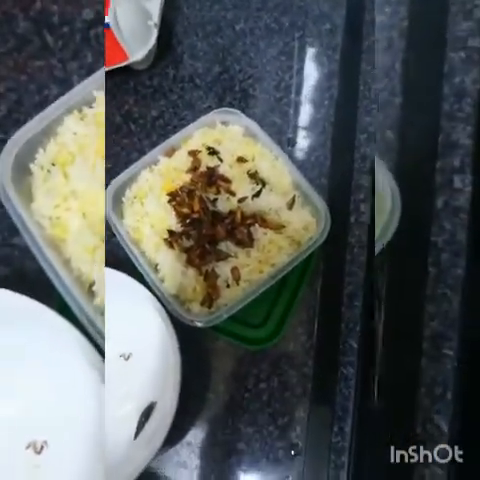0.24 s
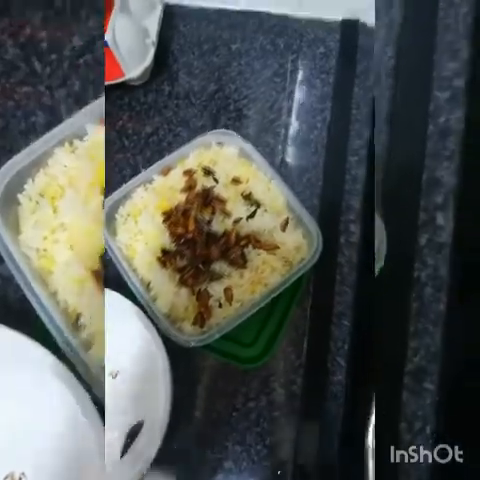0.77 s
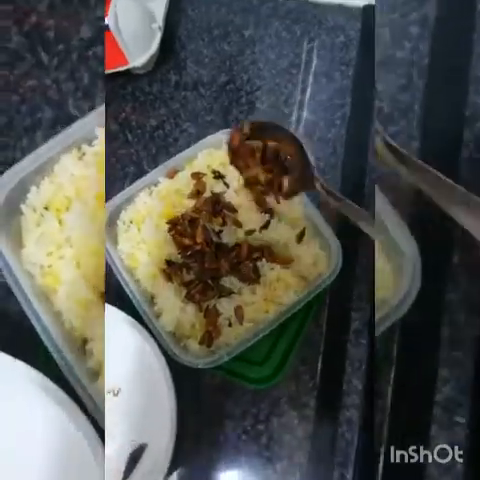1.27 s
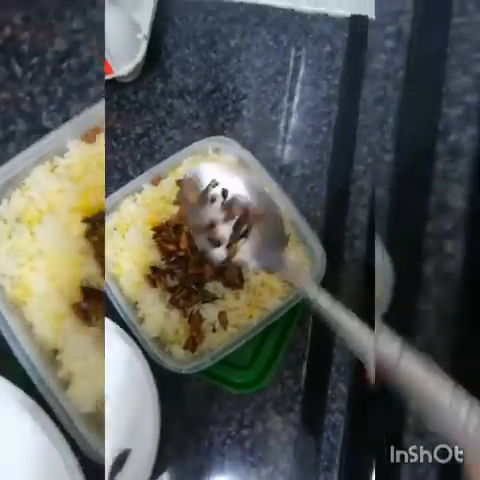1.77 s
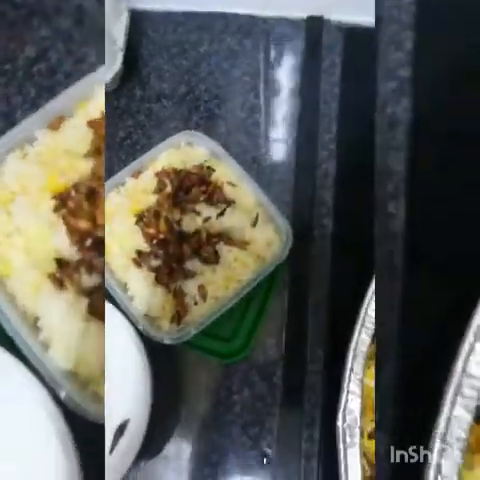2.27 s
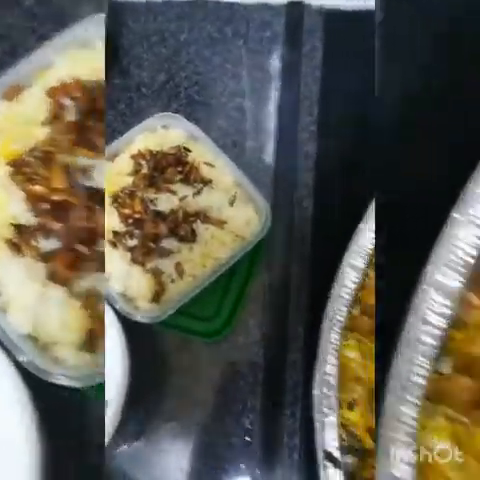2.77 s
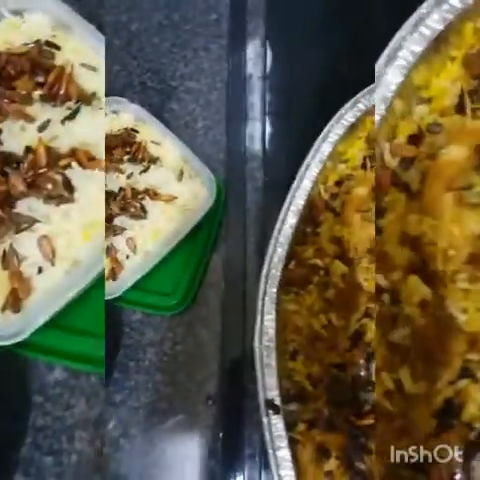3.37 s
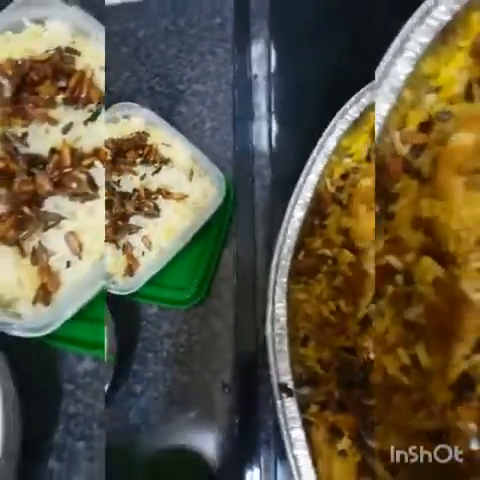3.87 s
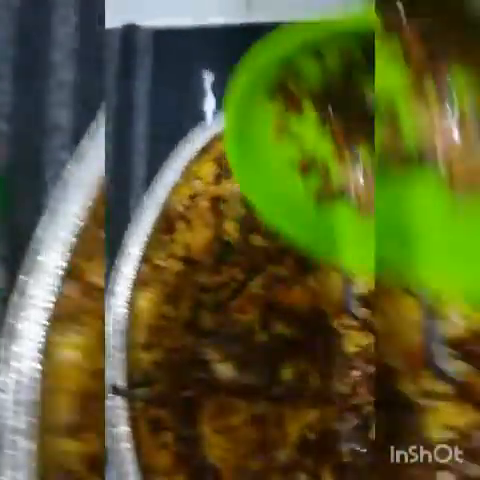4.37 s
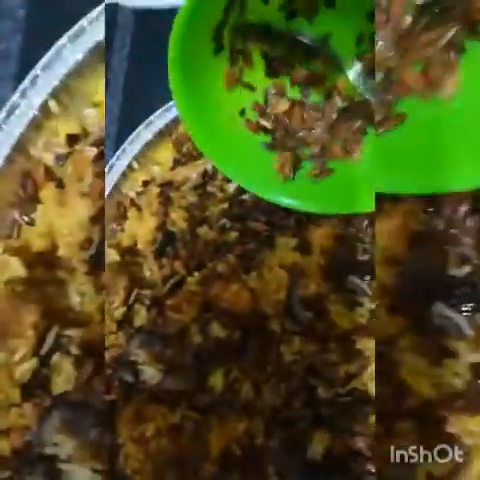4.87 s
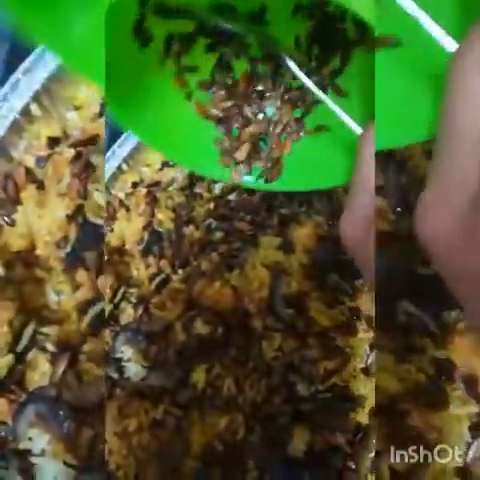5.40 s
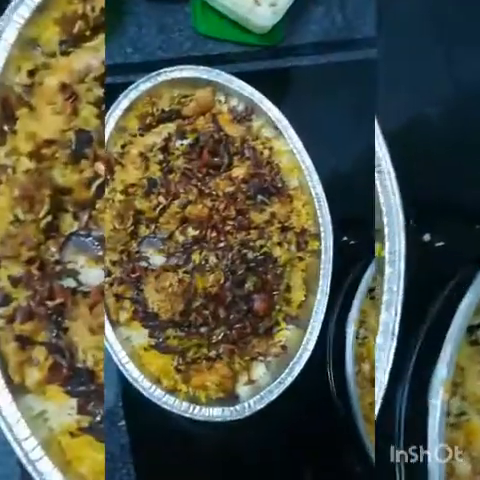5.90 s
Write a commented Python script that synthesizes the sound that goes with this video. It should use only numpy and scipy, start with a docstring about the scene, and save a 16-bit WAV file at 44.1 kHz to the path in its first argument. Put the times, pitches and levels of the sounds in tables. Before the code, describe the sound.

A burst of crisp foil and plastic crinkling opens at once, with a container knocking and thudding on a stone counter. After a quiet gap over faint appliance hum, the container bumps and rocks to rest. A soft hollow tap follows, then a spoon scrapes and cracks crisp fried onion in a plastic bowl while a low drone swells. Close stereo phone microphone, small hard kitchen.

```python
"""Thin foil and plastic crinkle at once as a container knocks and thuds on a stone kitchen counter,
over a low appliance hum and room rumble. Later the container rocks to rest, a bowl gives a hollow tap,
and a spoon scrapes crisp fried onion in the plastic bowl while a low drone swells. Snaps and cracks are
sharp pulses plus dying noise, rubbing is dense tiny clicks plus hiss, thuds and rings are dying sines.
A phone's two microphone ports hear it close by, and a small hard room answers the handling."""
import sys
import numpy as np
from scipy import signal
from scipy.fft import rfft, irfft
from scipy.io import wavfile
from scipy.ndimage import uniform_filter1d

SR = 44100
rng = np.random.default_rng(int(sys.argv[2]) if len(sys.argv) > 2 else 0)


def wrap_up_sound(samples):
    """Save the sound to the file named by the first command line argument, as 16-bit audio."""
    columns = np.atleast_2d(samples).T
    # keep every value between -1 and 1, then stretch to whole-number steps
    tamed = np.clip(columns, -1, 1)
    steps = np.round(tamed * 32767).astype(np.int16)
    wavfile.write(sys.argv[1], SR, steps)


N = 271082
TIME = np.arange(N) / SR  # the whole scene (s)
AGE = np.arange(8192) / SR  # time since a single hit (s)
HZ = np.fft.rfftfreq(2048, 1 / SR)  # frequencies at which a click's colour is set

# Levels in the tables are relative: the sources add gains of their own.
# room rumble and hiss, colour: [f/Hz, level/dB per Hz]
AIR_COLOUR = [(15, -49), (25, -4.5), (101, -12.5), (133, -9), (188, -13.5), (240, -10), (305, -16.5),
              (340, -18), (523, -25), (871, -23.5), (945, -24), (1270, -25.5), (2630, -28.5), (7700, -32),
              (15500, -40)]
# appliance hum, one tone a row: [f/Hz, level/dB, width/Hz]
HUM_TONES = [(127.6, -72.5, 4.1), (244.8, -80.5, 13), (296.7, -83.5, 5.3)]
# loudness of a hollow low drone: [t/s, level/dB]
DRONE_LEVEL = [(0, -76.5), (4.2, -75), (4.7, -66.5), (5.5, -67), (5.65, -74.5), (6.15, -74.5)]
# a thin container wall buckles: [t/s, level/dB, brightness/dB per octave, low body/dB, left-right/dB]
WALL_SNAPS = [(.0071, -28, 1, 13.5, 0), (0.0397, -33.5, 5.5, -7, 11), (0.0945, -35.5, 12, 9.5, 2),
              (.2142, -32, -3, 0, 0.5), (0.2513, -37, 6, 5.5, 1), (0.2685, -38, 11, 2, 1),
              (.3039, -38.5, 6, -1, 9), (0.32, -33, -6, -11, -4), (.3296, -21, 3.5, -0.5, 4.5),
              (0.3424, -21.5, 9, 9, 1), (0.5013, -46, -13, -25, -10), (.5155, -34, -17, -30, -1),
              (.521, -37.5, -14, -28, 1), (0.5629, -40.5, -9, -10, -5), (0.5945, -36.5, 4, 5.5, 5),
              (0.6155, -42, 8.5, 14.5, -1), (.776, -40.5, -12, 1, -1), (0.8275, -50, -6, 0, 0),
              (0.8309, -30, -2.5, 8, 2), (2.5939, -37.5, -19, 3.5, -1), (2.639, -48.5, 0, 12.5, 2),
              (2.7874, -43.5, 10, 20.5, 0), (3.145, -49.5, -9, -2, 1)]
# fingers squeeze the thin wall: [t at the hardest/s, level/dB, rise/s, fall/s, level of the fine fizz/dB]
WALL_SQUEEZES = [(.005, -44, 0.022, 0.08, -56), (.135, -54, 0.13, 0.22, -56), (.315, -53, 0.057, 0.12, -67),
                 (.525, -67, 0.088, 0.11, -62.5), (3.59, -53, 0.095, 0.06, -68),
                 (3.815, -53.5, 0.08, 0.046, -66)]
# colour of a buckling thin wall: [f/Hz, level/dB per Hz]
THIN_WALL_COLOUR = [(100, -27.5), (550, -33), (780, -23), (1200, -11), (1800, -16), (2500, -6.5),
                    (3400, 7.5), (4600, 3), (6800, -0.5), (8000, -11.5), (10000, -24), (13000, -39.5),
                    (16000, -51)]
# colour of the fine fizz: [f/Hz, level/dB per Hz]
FIZZ_COLOUR = [(100, -13), (2000, -5), (5000, -2), (8500, -1.5), (11500, -12), (16000, -13)]
# the phone's body shades one port or the other, for sound from the thin wall: [f/Hz, left-right/dB]
WALL_SHADING = [(300, 17.5), (800, -15.5), (1400, -6.5), (2500, -5.5), (4000, 0), (6000, 6), (9000, -0.5)]
# a container knocks: [t/s, level/dB, brightness/dB per octave, low weight/dB, favoured ring f/Hz]
CONTAINER_KNOCKS = [(.001, -26.5, -4, 2, 810), (0.0203, -28, -4, -1, 2220), (0.028, -36.5, 5, 8, 1100),
                    (.076, -39.5, -7, 7, 820), (.088, -44, 1, -5, 1660), (.209, -47, -1, 3, 1866),
                    (.832, -34.5, -12, -30, 840), (2.596, -43, -3, -30, 1100),
                    (2.7306, -30.5, -6.5, -14, 1970), (2.7455, -29, -8.5, 4.5, 786),
                    (2.768, -39.5, 0, -10, 1600), (2.82, -35.5, -6, 4, 1670), (2.8568, -37, -4, -21, 2200),
                    (2.8602, -35.5, -6.5, -6, 1590), (2.952, -46.5, -7, -12, 1660),
                    (2.9679, -43, -15, -4, 1610), (2.984, -43, -10, -8, 1660),
                    (3.0724, -40, -3.5, -9.5, 1460), (3.082, -42, -7, -15, 1280),
                    (3.8216, -38.5, -3.5, -22, 1110)]
# colour of knocks on the counter: [f/Hz, level/dB per Hz]
COUNTER_COLOUR = [(30, -38), (90, -14), (330, -1.5), (600, -4.5), (790, 3.5), (920, -2.5), (1120, 0),
                  (1400, -7.5), (2200, -5.5), (3000, -7), (4000, -7), (6500, -12), (9000, -20.5),
                  (15000, -33.5)]
# tones of a knocked container wall: [f/Hz, level/dB, t60/s]
CONTAINER_MODES = [(818, -4, .06), (1088, -1.5, 0.1), (1302, 2, 0.1), (1612, -1.5, .07), (1660, -2, 0.052),
                   (1884, -6.5, 0.07), (2238, 0.5, 0.064)]
# the weight of a full container thuds on the counter: [t/s, level/dB, pitch f/Hz]
COUNTER_THUDS = [(.004, -39.5, 97), (.028, -31.5, 127), (.055, -42, 120), (0.218, -49.5, 121),
                 (2.749, -32.5, 117.4), (2.793, -36, 104.5), (2.818, -38, 84), (2.864, -37, 95.3),
                 (2.969, -40.5, 105), (2.995, -47, 121), (3.074, -43.5, 90.2), (3.502, -51, 105.4),
                 (3.551, -53, 78)]
# tones of a thud: [multiple of its pitch, level/dB, t60/s]
COUNTER_MODES = [(.78, -6, 0.23), (1, 0.5, 0.11), (1.75, 1.5, 0.078), (2.1, -3, 0.11), (2.6, -12, 0.073),
                 (3.6, -5, 0.041)]
# a hollow tap as the bowl is picked up: (t/s, level/dB, left-right/dB)
PICKUP_TAP = (4.04, -46, -10.5)
# tones of that tap: [f/Hz, level/dB, t60/s]
PICKUP_MODES = [(388, -5, 0.028), (720, -32, 0.017), (770, -1, 0.071), (885, -16, 0.026), (1060, -18, 0.11)]
# crisp onion cracks between spoon and bowl: [t/s, level/dB, brightness/dB per octave]
ONION_CRACKS = [(4.4829, -45, -10), (4.6073, -45, -20), (4.64, -42, 4), (4.652, -36.5, 5),
                (4.7054, -42, -1), (4.7265, -36.5, -3), (4.741, -33, 13), (4.7534, -28, 9),
                (4.7861, -29.5, -10), (4.814, -36.5, -15), (4.8498, -26, 1), (4.896, -22.5, 1.5),
                (4.9062, -33, 14), (4.9726, -33.5, 0), (5.0101, -29.5, -5), (5.113, -46.5, -2),
                (5.3256, -36.5, 6), (5.33, -30, 0), (5.3597, -27.5, 7), (5.3708, -31, 3),
                (5.4475, -34.5, 1), (5.464, -39, 3), (5.4759, -33.5, 4), (5.5047, -34, -5),
                (5.513, -29, 2.5)]
# colour of cracking onion: [f/Hz, level/dB per Hz]
ONION_COLOUR = [(100, -45), (1000, -31), (1700, -22), (2500, -8), (3600, 0.5), (4700, -0.5), (5900, -1.5),
                (7200, -6), (9000, -16), (12000, -35.5), (16000, -49)]
# the spoon bumps the bowl: [t/s, level/dB, pitch as a factor on the bowl's tones]
SPOON_BUMPS = [(4.466, -55, 0.94), (4.65, -52.5, 1.6), (4.7535, -36.5, 1.13), (4.77, -43, 1.58),
               (4.786, -40, 1.31), (4.922, -43.5, 0.96), (5.052, -50.5, 1.05), (5.08, -52.5, 1.25)]
# tones of the plastic bowl: [f/Hz, level/dB, t60/s]
PLASTIC_BOWL_MODES = [(768, -1, 0.072), (824, -6.5, 0.026), (1090, -1.5, 0.01)]
# the spoon pushes through: [t at the hardest/s, level/dB, rise/s, fall/s, level of its drag on the bowl/dB]
SPOON_STROKES = [(4.48, -63, 0.046, 0.11, -70.5), (4.63, -55.5, 0.076, 0.09, -67),
                 (4.745, -42.5, 0.068, 0.073, -56), (4.865, -41.5, 0.085, 0.08, -55),
                 (5, -48, 0.058, 0.075, -61.5), (5.09, -61.5, 0.065, 0.37, -68),
                 (5.333, -44.5, 0.023, 0.098, -65), (5.475, -44.5, .07, 0.065, -73)]
# pitch at the spots the spoon drags over: factors on the bowl's tones
DRAG_SPOTS = [.95, 1, 1.07, 1.16]
# the phone's body shades one port or the other, for sound from the bowl: [f/Hz, left-right/dB]
BOWL_SHADING = [(300, 2), (800, 8.5), (2500, 3.5), (3500, -1), (5000, 13), (8000, 7), (13000, 18)]
# how long the room's tail lasts: [f/Hz, t60/s]
ROOM_DECAY = [(150, 0.39), (800, 0.19), (2500, 0.16), (6000, 0.15), (14000, .13)]

STOP_S = 5.535  # spoon and hum start a 15 ms fade to silence here
AIR_DB = -67  # loudness of the room noise (rms)
PORT_GAP_M, SOUND_SPEED = 0.39, 343  # effective acoustic spacing of the ports (m), speed of sound (m/s)
AIR_SIDE_SHARE, AIR_LAG = 0.27, 27.5  # share coming from the left, its delay to the right port (samples)
RATTLE_ALIKE_HZ, ROOM_ALIKE_HZ = 1103, 387  # well below these, both ports hear the noise nearly alike
SWELL_DB = 20  # a movement gains this in its rise time and loses it in its fall time
FIZZ_LINGER, DRAG_LINGER = 1.53, 2.3  # fizz and drag swell and fade this many times more slowly
# ring of a knocked wall: level (dB), loss per octave from the favoured pitch (dB), pitch scatter (share)
RING_DB, RING_FALL_DB, RING_DETUNE = -24.5, 23.5, 0.017
# skid gain (dB) = SKID_DB + SKID_PER_DB * thud level; rise and fall times in s
SKID_DB, SKID_PER_DB, SKID_RISE_S, SKID_FALL_S = -33.5, 0.66, 0.028, 0.17
THUD_LAG_S = 0.00017  # the left port hears a thud this much later
EDGE_HZ = 15950  # top of the phone's band


def amp(db):
    """Turns decibels into gain."""
    return 10 ** (np.asarray(db) / 20)


def unit(x):
    """Scales to an rms of one."""
    return x / np.sqrt(np.mean(x ** 2) + 1e-20)


def dying(t, t60):
    """Exponential decay that loses 60 dB in t60 seconds."""
    return np.exp(-np.log(1000) * t / t60)


def read(points, hz):
    """Reads a table along a logarithmic frequency axis."""
    f, value = np.transpose(points)
    return np.interp(np.log(hz + 1), np.log(f + 1), value)


def level(curve):
    """Gain over time from rows of (s, dB); silent outside them."""
    s, db = np.transpose(curve)
    inside = (TIME >= s[0]) * (TIME <= s[-1])
    return amp(np.interp(TIME, s, db)) * inside


def panned(db):
    """Left and right gains for a level difference."""
    return amp(np.array([[db], [-db]]) / 2)


def add(mix, s, sound):
    """Adds a stereo sound at time s, cut off at the end of the mix."""
    start = max(round(s * SR), 0)
    part = mix[:, start:][:, :sound.shape[1]]
    part += sound[:, :part.shape[1]]


def through(x, response):
    """Passes sound through a response, keeping its length."""
    return signal.oaconvolve(x, np.atleast_2d(response), axes=1)[:, :x.shape[1]]


def high_pass(x, order, hz):
    """Removes sound below hz."""
    return signal.sosfilt(signal.butter(order, hz, "high", fs=SR, output="sos"), x)


def click(db):
    """The sharpest pulse with this spectrum (minimum phase), of energy one."""
    log_gain = np.log(amp(np.r_[db, db[-2:0:-1]]))
    pulse = np.fft.ifft(np.exp(np.conj(signal.hilbert(log_gain)))).real
    return pulse / np.linalg.norm(pulse)


def shelf(hz):
    """Rises from 0 to 1 around hz."""
    return HZ ** 4 / (HZ ** 4 + hz ** 4)


def tilt(hz):
    """Octaves above a soft corner."""
    return np.log2(1 + (HZ / hz) ** 4) / 4


def patch(depth_db):
    """Every spot that gives way has broad resonances of its own: smoothed random bumps in dB."""
    bumps = rng.standard_normal(len(HZ))
    for _ in range(2):
        bumps = uniform_filter1d(bumps, size=30)
    return depth_db * unit(bumps)


def noise_pair(alike_hz, lag, size):
    """Noise at the two ports: alike in the bass, lag samples later on the right."""
    hz = np.fft.rfftfreq(size, 1 / SR)
    a, b = rfft(rng.standard_normal((2, size)))
    same = 1 / (1 + (hz / alike_hz) ** 2)
    right = same * a + np.sqrt(1 - same ** 2) * b
    delay = np.exp(-2j * np.pi * hz * lag / SR)
    return irfft(np.array([a, right * delay]), size)


def ring(modes):
    """A struck object's tones: dying sines from rows of (Hz, dB, t60)."""
    return sum(amp(db) * dying(AGE, t60) * np.sin(2 * np.pi * hz * AGE) for hz, db, t60 in modes)


def snap(colour_db, rattle_db, t60, lag, flutter_db=-6):
    """A pulse, a brief flutter and a longer rattle, reaching the right port lag samples later."""
    drive = np.zeros((2, len(AGE)))
    for db, decay_s in ((flutter_db, .004), (rattle_db, t60)):
        noise = noise_pair(RATTLE_ALIKE_HZ, lag, size=len(AGE)) * dying(AGE, decay_s)
        drive += amp(db) * noise / np.linalg.norm(noise, axis=1, keepdims=True)
    # the pulse itself; a negative lag delays the left port instead
    drive[0, max(-round(lag), 0)] += 1
    drive[1, max(round(lag), 0)] += 1
    return through(drive, click(colour_db))


def grains(per_s, spread_db, hiss):
    """Random tiny fractures of very unequal size over a smooth rubbing hiss."""
    at = np.flatnonzero(rng.random(N) < per_s / SR)
    size_db = spread_db * np.minimum(rng.exponential(1, len(at)), 3.5)
    clicks = np.zeros(N)
    clicks[at] = amp(size_db) * rng.choice([-1, 1], len(at))
    return unit(clicks) + hiss * rng.standard_normal((2, N))


def crackle(colour, per_s, spread_db, hiss, patch_db, t60, lag, bright_db=0, count=5):
    """Many grains, shared between several differently tuned spots."""
    colour_db = read(colour, HZ) + bright_db * tilt(hz=3520)
    out = np.zeros((2, N))
    for _ in range(count):
        spot = snap(colour_db + patch(patch_db), rattle_db=0, t60=t60, lag=lag)
        out += through(grains(per_s / count, spread_db, hiss), spot)
    return unit(out)


def swells(moves):
    """Gain of movements that swell and fade, from rows of (s at the peak, dB, rise s, fall s)."""
    t = TIME[::32]  # coarse steps suffice for a slow curve
    power = np.zeros(len(t))
    for s, db, rise, fall in moves:
        distance = np.maximum((s - t) / rise, (t - s) / fall)
        power += amp(db - SWELL_DB * distance) ** 2
    return np.interp(TIME, t, np.sqrt(power))


def effort(moves, linger):
    """Gains of the two layers that a hand movement drives; the second one lingers."""
    main = swells([(s, db, rise, fall) for s, db, rise, fall, _ in moves])
    slow = swells([(s, db, linger * rise, linger * fall) for s, _, rise, fall, db in moves])
    return main, slow


def shaded(x, shade):
    """Colours the two ports differently: the left takes 0.27 of the shade, the right 0.7 the other way."""
    shade_db = read(shade, np.fft.rfftfreq(N, 1 / SR))
    return irfft(rfft(x) * amp(np.array([0.27 * shade_db, -.7 * shade_db])), N)


def kitchen(x, wet_db):
    """Adds a diffuse tail that builds in a few ms and dies sooner in the treble."""
    noise = noise_pair(ROOM_ALIKE_HZ, lag=0, size=SR // 2)
    hz, t, z = signal.stft(noise, SR, nperseg=256)
    decay = dying(t, read(ROOM_DECAY, hz)[:, None])
    tail = signal.istft(z * decay, SR, nperseg=256)[1]
    tail *= 1 - np.exp(-np.arange(tail.shape[1]) / SR / 0.0021)
    return x + amp(wet_db) * through(x, tail / np.linalg.norm(tail[0]))


def wavering(hz, width):
    """A low tone of unsteady strength and pitch: noise in a narrow band."""
    offset = 2 * (np.fft.rfftfreq(N, 1 / SR) - hz) / width
    return unit(irfft(rfft(rng.standard_normal(N)) / (1 + offset ** 2), N))


def air():
    """Coloured noise: room rumble shared by both ports, and a faint hiss that comes partly from the left."""
    hz = np.fft.rfftfreq(N, 1 / SR)
    a, b = rfft(rng.standard_normal((2, N)))
    # spaced ports hear diffuse sound alike only in the bass
    diffuse = np.sinc(2 * hz * PORT_GAP_M / SOUND_SPEED)
    from_left = np.exp(-2j * np.pi * hz * AIR_LAG / SR)
    same = (1 - AIR_SIDE_SHARE) * diffuse + AIR_SIDE_SHARE * from_left
    right = same * a + np.sqrt(np.maximum(1 - abs(same) ** 2, 0)) * b
    z = np.array([a, right]) * amp(read(AIR_COLOUR, hz))
    return amp(AIR_DB) * unit(irfft(z, N))


def hum():
    """An appliance hums in a few wavering low tones."""
    return sum(amp(db) * wavering(hz, width) for hz, db, width in HUM_TONES)


def drone():
    """A hollow drone: a broad wavering band whose level follows a curve."""
    return level(DRONE_LEVEL) * wavering(hz=216.3, width=71)


def crinkling():
    """Thin walls buckle in single snaps, with fine creasing in between."""
    out = np.zeros((2, N))
    for s, db, bright_db, body_db, pan_db in WALL_SNAPS:
        colour = read(THIN_WALL_COLOUR, HZ) + bright_db * tilt(hz=3440)
        colour += body_db * (1 - shelf(hz=2450)) + patch(depth_db=0.5)
        rattle_db = -5 + 0.59 * body_db  # the more of the wall moves, the more it rattles
        add(out, s, amp(db + 14.5) * panned(pan_db) * snap(colour, rattle_db, t60=0.031, lag=-1.5))
    creasing, fizzing = effort(WALL_SQUEEZES, FIZZ_LINGER)
    # tiny creases are brighter than whole snaps
    creases = crackle(THIN_WALL_COLOUR, per_s=700, spread_db=6, hiss=.45, patch_db=3, t60=.007, lag=0,
                      bright_db=3.5)
    fizz = crackle(FIZZ_COLOUR, per_s=1300, spread_db=4, hiss=.6, patch_db=4, t60=.008, lag=0)
    out += amp(-5.5) * creasing * creases + amp(-3.5) * fizzing * fizz
    return shaded(kitchen(out, wet_db=-3.5), WALL_SHADING)


def wall_ring(near_hz):
    """The ring of a knocked wall: the spot that is hit favours the tones around near_hz."""
    pitch = 1 + RING_DETUNE * rng.uniform(-0.83, 1)
    modes = []
    for hz, db, t60 in CONTAINER_MODES:
        loss_db = RING_FALL_DB * abs(np.log2(hz / near_hz))
        modes.append((hz * pitch, db - loss_db, t60))
    return ring(modes)


def knocking():
    """A container lands, skids a little and rocks on the stone; its wall rings briefly."""
    out = np.zeros((2, N))
    for s, db, bright_db, weight_db, near_hz in CONTAINER_KNOCKS:
        colour = read(COUNTER_COLOUR, HZ) + bright_db * tilt(hz=2920)
        colour += weight_db * (1 - shelf(hz=700))
        knock = snap(colour, rattle_db=4.5, t60=0.062, lag=-25, flutter_db=-2)
        knock += amp(RING_DB) * wall_ring(near_hz)
        add(out, s, amp(db + 11.0) * panned(-1.1) * knock)
    # around each thud it skids: the heavier the landing, the louder
    skids = swells([(s, SKID_DB + SKID_PER_DB * db, SKID_RISE_S, SKID_FALL_S) for s, db, _ in COUNTER_THUDS])
    grit = crackle(COUNTER_COLOUR, per_s=450, spread_db=5, hiss=.4, patch_db=5, t60=.02, lag=-26)
    return kitchen(out + skids * grit, wet_db=-3)


def thudding():
    """The load behind each landing rings the counter low; it reaches the right port first."""
    out = np.zeros((2, N))
    for s, db, hz in COUNTER_THUDS:
        modes = [(hz * multiple, mode_db, t60) for multiple, mode_db, t60 in COUNTER_MODES]
        thud = ring(modes) * (1 - np.exp(-AGE / 0.0025))  # soft start
        left = np.interp(AGE - THUD_LAG_S, AGE, thud)
        add(out, s, amp(db - 1.8) * np.array([left, thud]))
    return high_pass(kitchen(out, wet_db=-9), order=4, hz=50)


def bowl_tap():
    """A soft noisy tick and a short hollow ring of dying sines."""
    s, db, pan_db = PICKUP_TAP
    out = np.zeros((2, N))
    tick = amp(4.5) * snap(read(THIN_WALL_COLOUR, HZ), rattle_db=11.5, t60=.025, lag=0)
    add(out, s, amp(db) * (panned(pan_db) * ring(PICKUP_MODES) + tick))
    return kitchen(out, wet_db=-8.5)


def bowl_ring(pitch):
    """The bowl's tones, shifted by where the spoon touches it."""
    return ring([(hz * pitch, mode_db, t60) for hz, mode_db, t60 in PLASTIC_BOWL_MODES])


def spoon():
    """Crisp onion cracks and scrapes under the spoon; the plastic bowl rings along."""
    out = np.zeros((2, N))
    for s, db, bright_db in ONION_CRACKS:
        colour = read(ONION_COLOUR, HZ) + bright_db * tilt(hz=3600) + patch(depth_db=2.5)
        crack = snap(colour, rattle_db=-2.0, t60=0.026, lag=8.43, flutter_db=-7.5)
        add(out, s, amp(db + 14.5) * crack)
    for s, db, pitch in SPOON_BUMPS:
        add(out, s, amp(db - 7.5) * panned(0) * bowl_ring(pitch))
    scrape, drag = effort(SPOON_STROKES, DRAG_LINGER)
    crumbs = crackle(ONION_COLOUR, per_s=550, spread_db=6, hiss=.3, patch_db=4, t60=.009, lag=9)
    fizz = crackle(FIZZ_COLOUR, per_s=740, spread_db=4, hiss=.7, patch_db=3, t60=.012, lag=9)
    out += scrape * (amp(-0.5) * crumbs + amp(-8.5) * fizz)
    # the dragging spoon slips in tiny jerks that set the bowl ringing
    slips = sum(through(grains(per_s=130, spread_db=6, hiss=.6), bowl_ring(pitch)) for pitch in DRAG_SPOTS)
    out += amp(-4.5) * drag * unit(slips)
    # a small bowl radiates little below its lowest tone
    out = high_pass(out, order=3, hz=560)
    return shaded(kitchen(out, wet_db=-9.5), BOWL_SHADING)


def scene():
    """All sources summed at the two ports; spoon and hum fade out together."""
    sounding = np.clip((STOP_S - TIME) / 0.015 + 1, 0, 1)
    room = air() + drone()
    handling = crinkling() + knocking() + thudding() + bowl_tap()
    return room + handling + sounding * (hum() + spoon())


def record(dry):
    """The phone's band limit: a steep filter removes the highest treble."""
    low_pass = signal.firwin(511, EDGE_HZ, window=("kaiser", 9), fs=SR)
    return signal.oaconvolve(dry, low_pass[None], "same")


dry = scene()
out = record(dry)
wrap_up_sound(out)
```